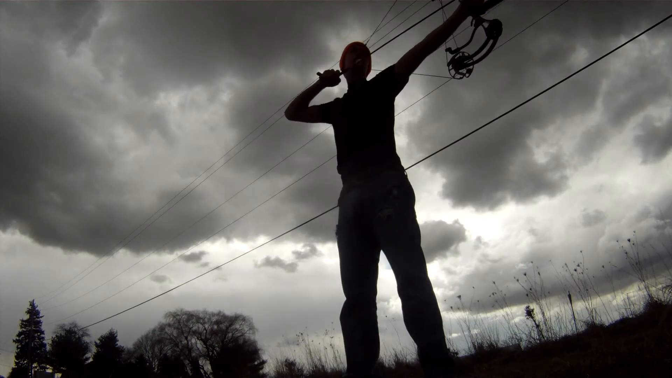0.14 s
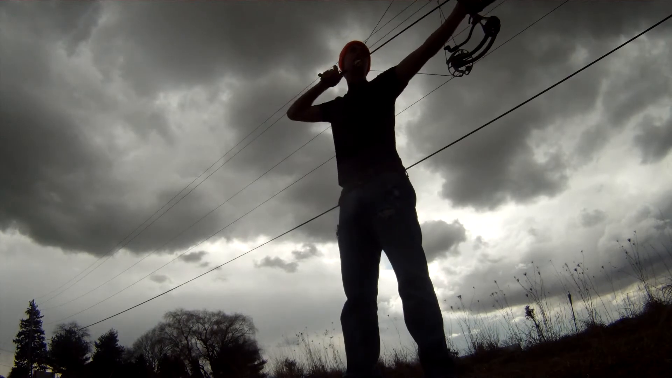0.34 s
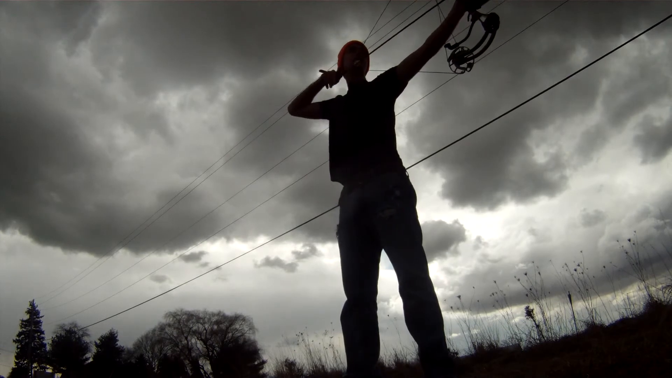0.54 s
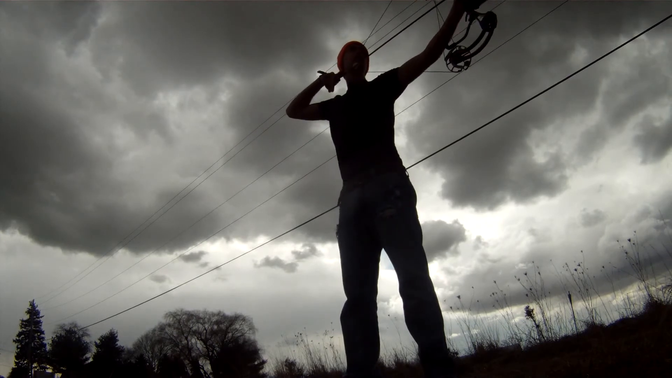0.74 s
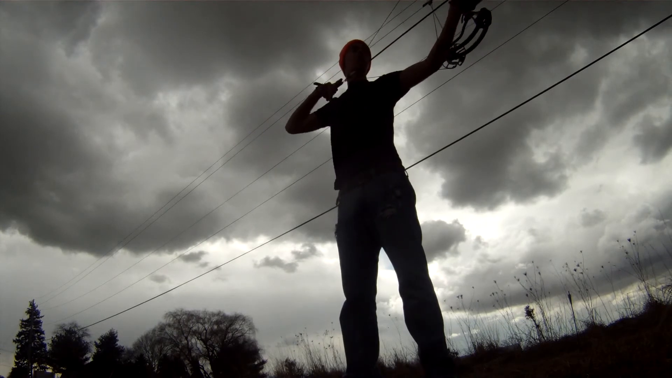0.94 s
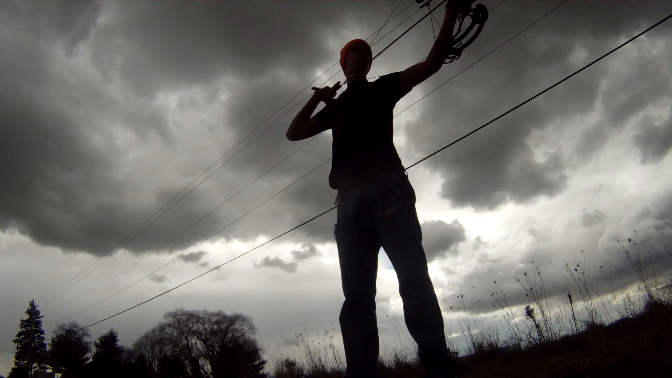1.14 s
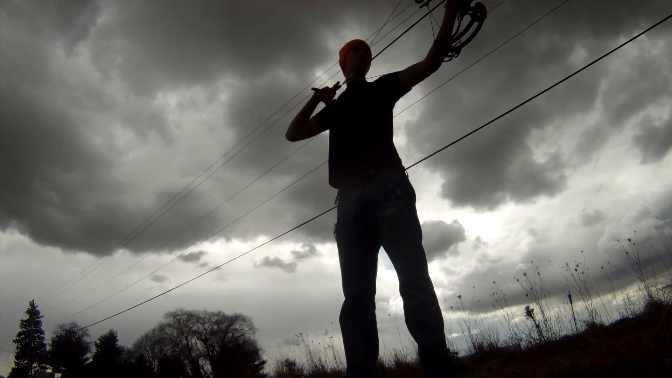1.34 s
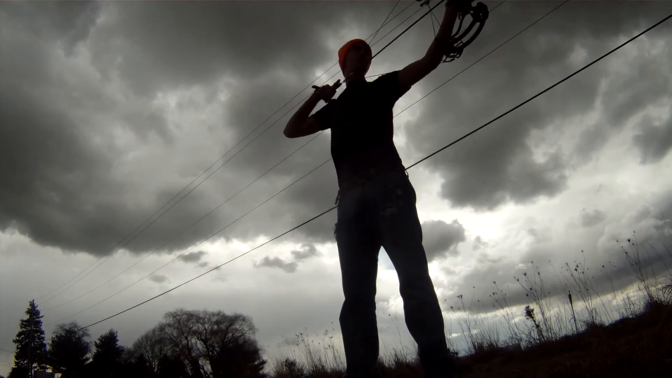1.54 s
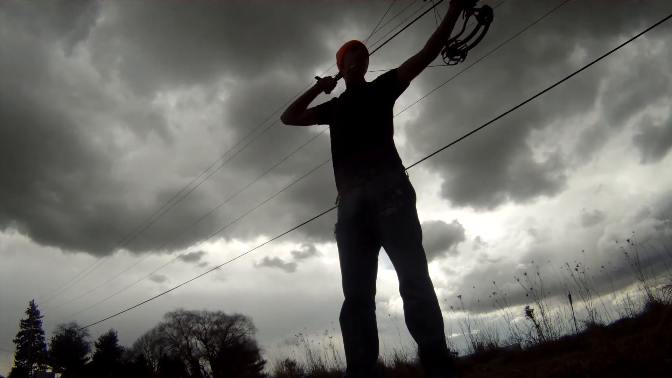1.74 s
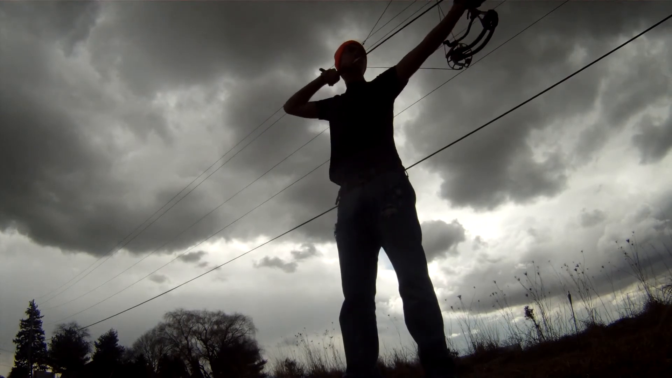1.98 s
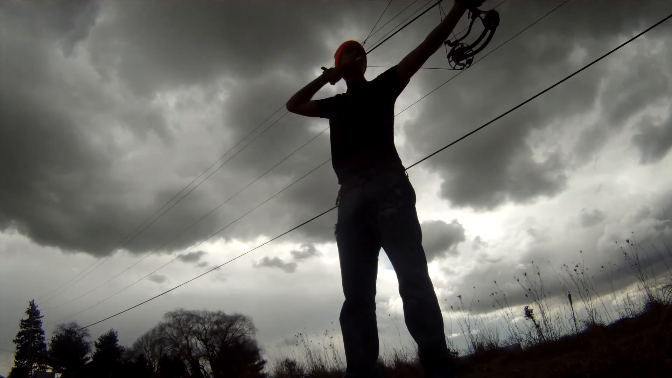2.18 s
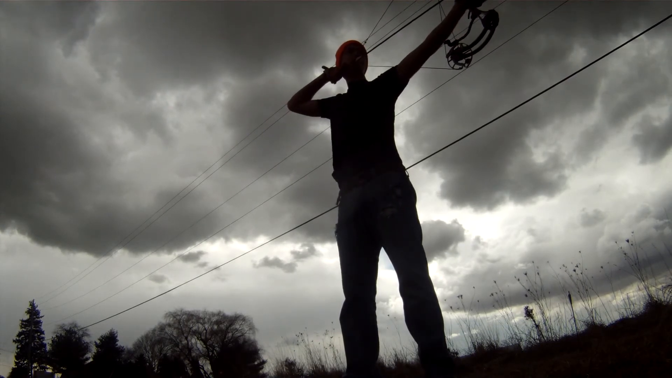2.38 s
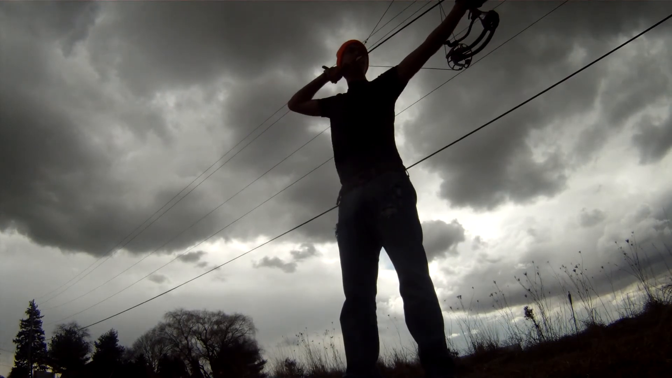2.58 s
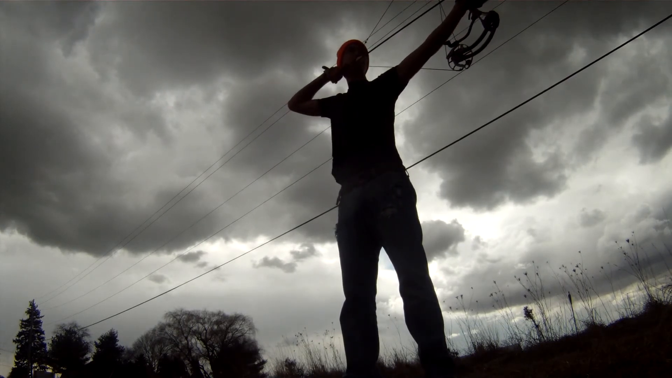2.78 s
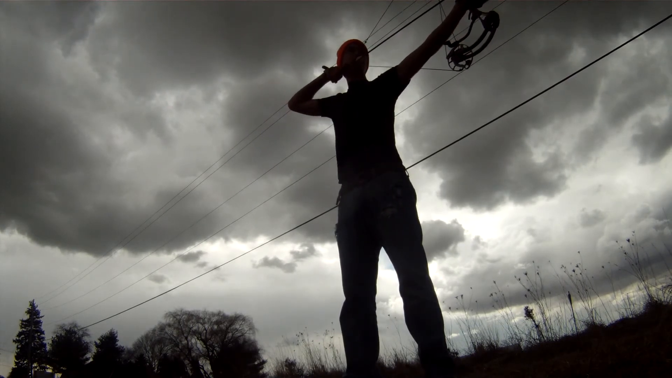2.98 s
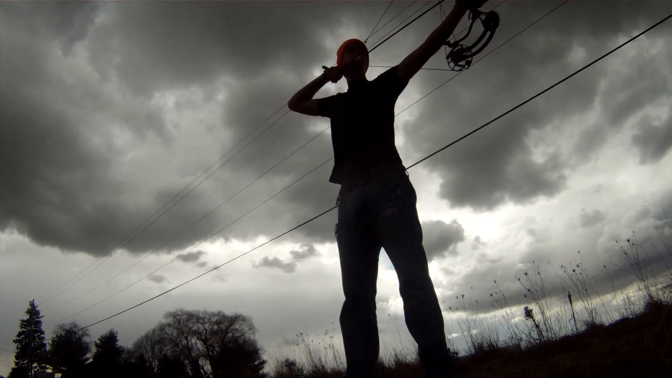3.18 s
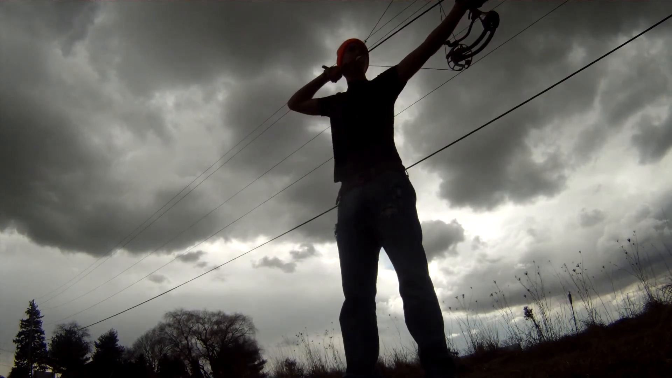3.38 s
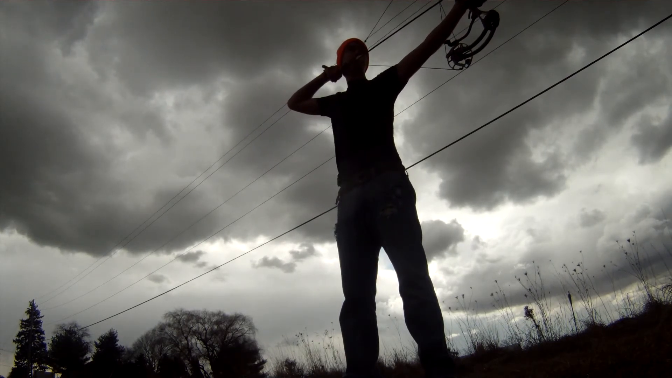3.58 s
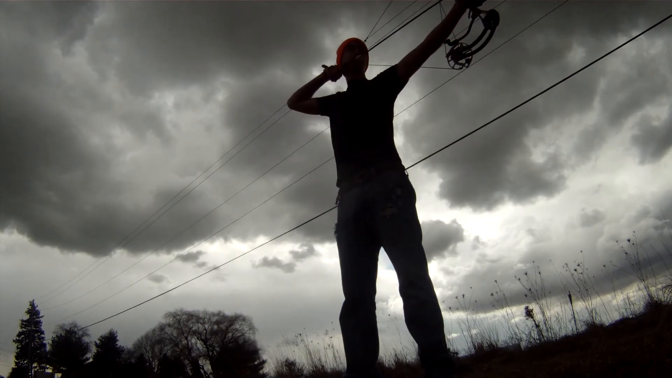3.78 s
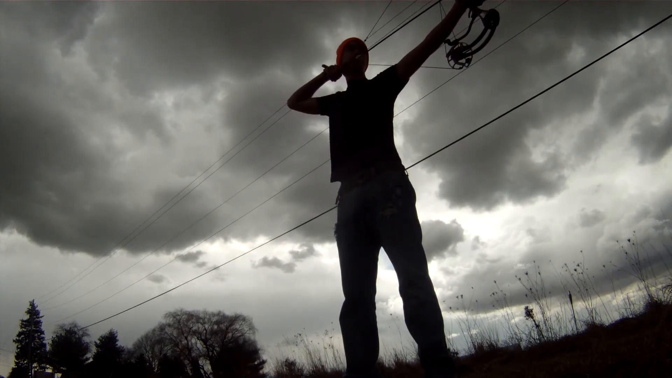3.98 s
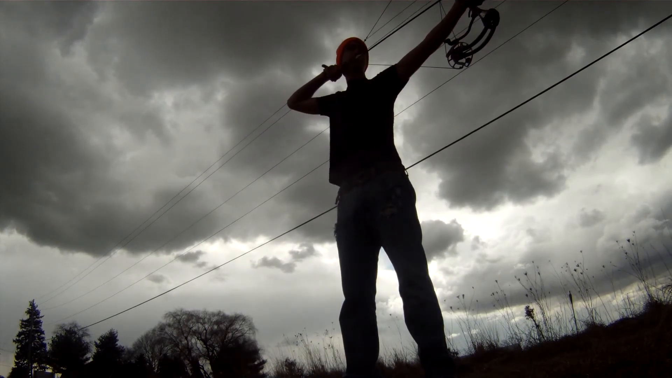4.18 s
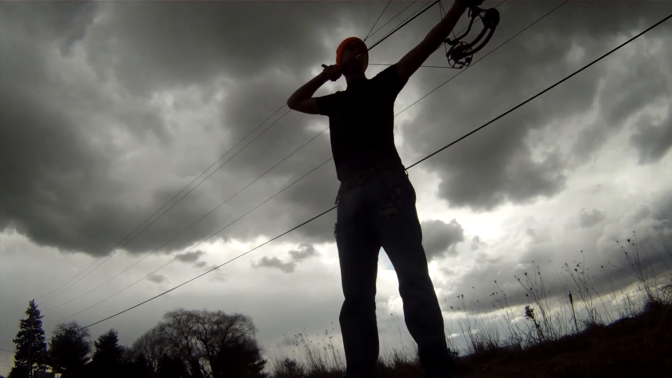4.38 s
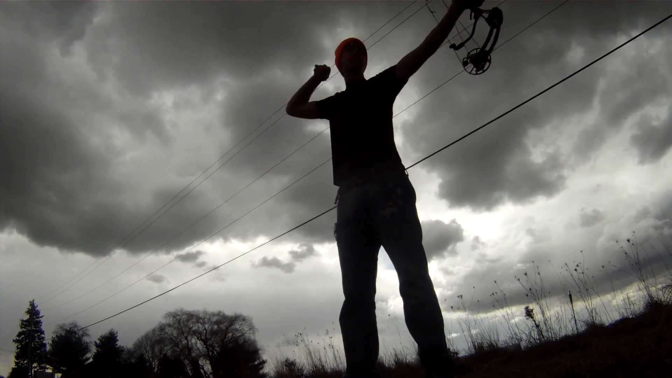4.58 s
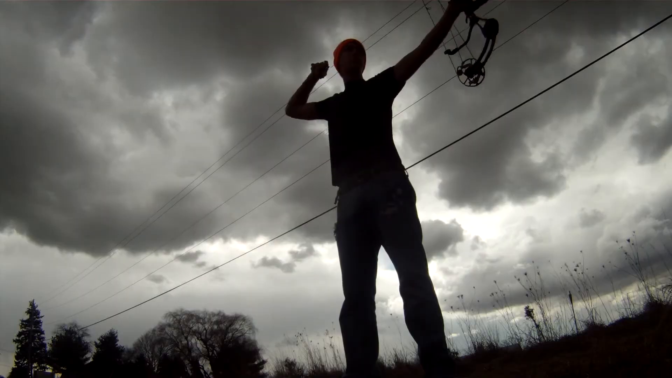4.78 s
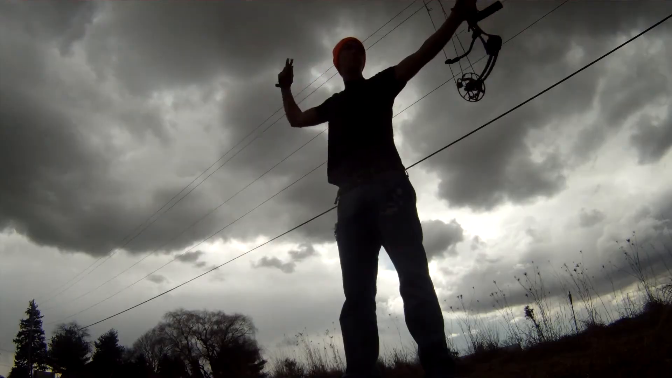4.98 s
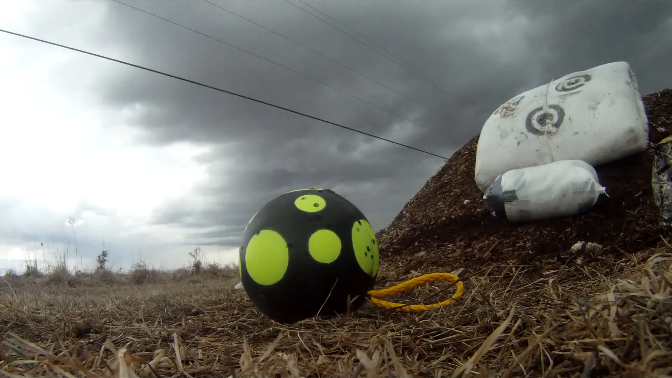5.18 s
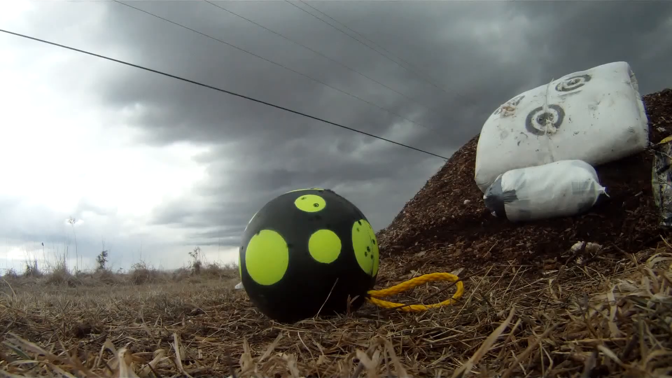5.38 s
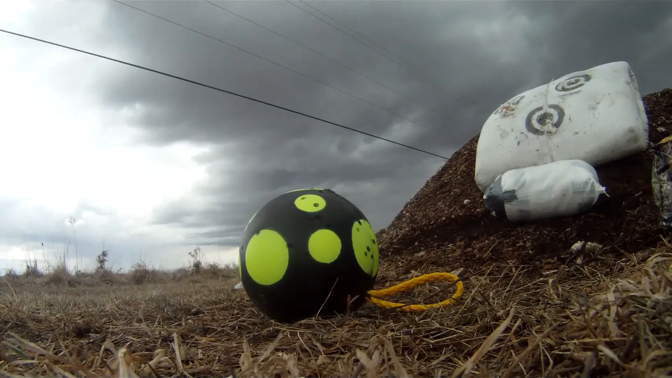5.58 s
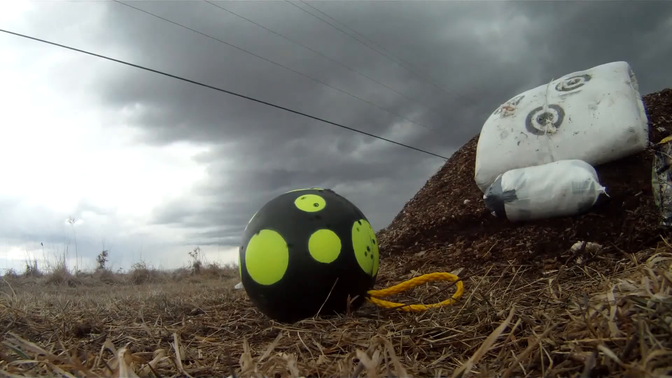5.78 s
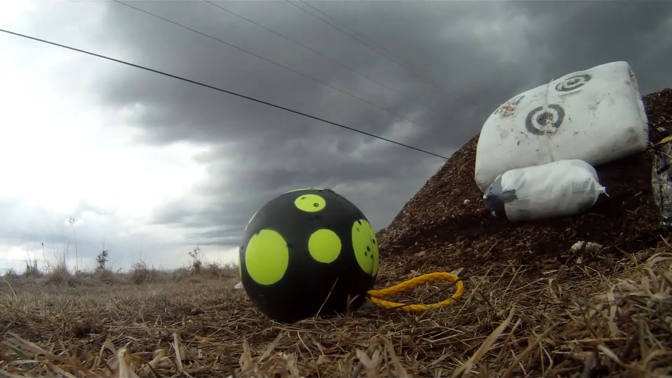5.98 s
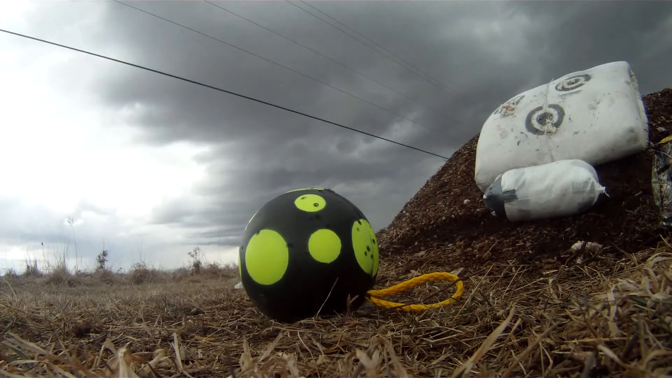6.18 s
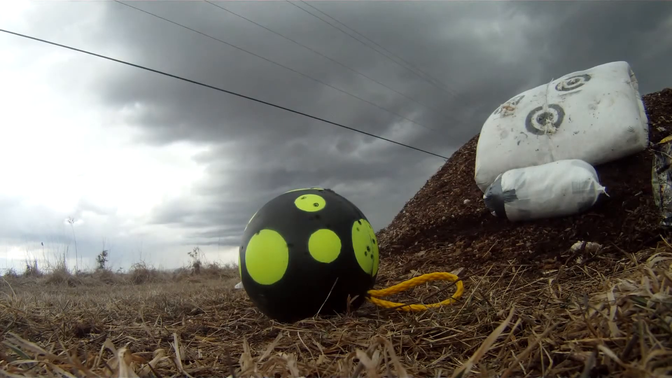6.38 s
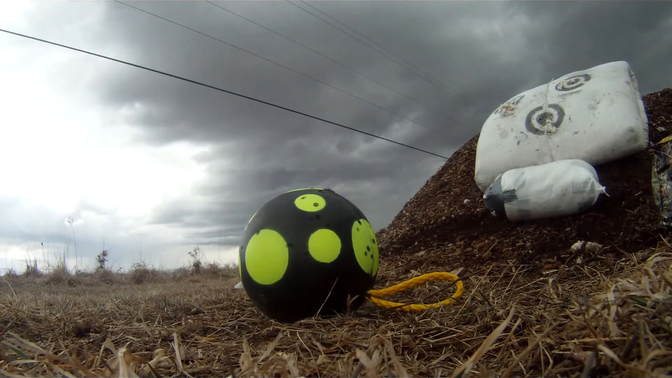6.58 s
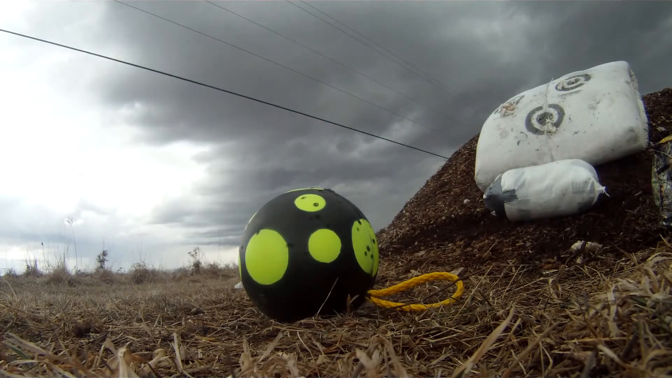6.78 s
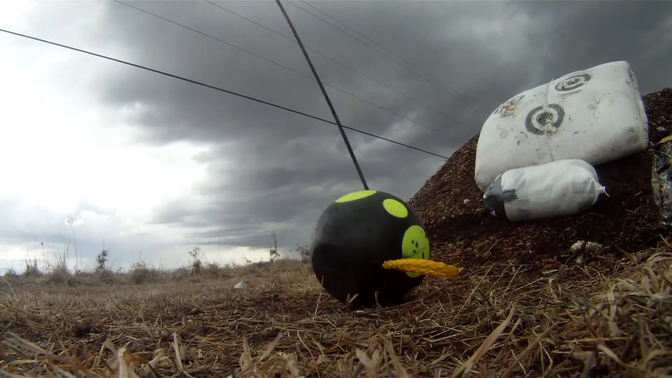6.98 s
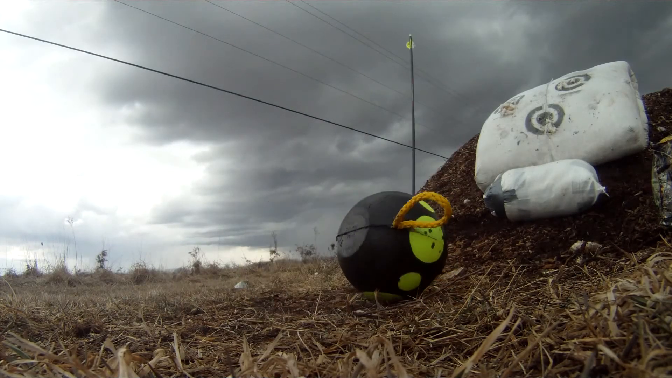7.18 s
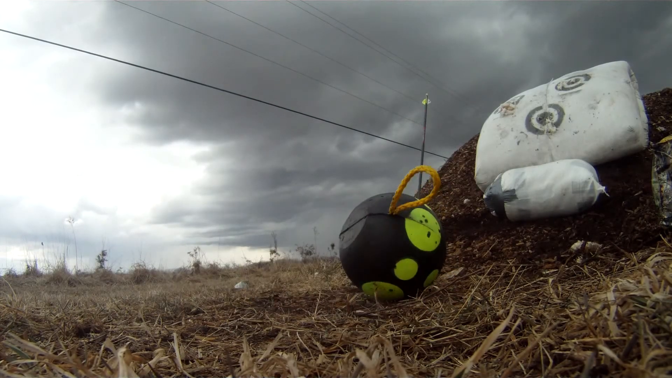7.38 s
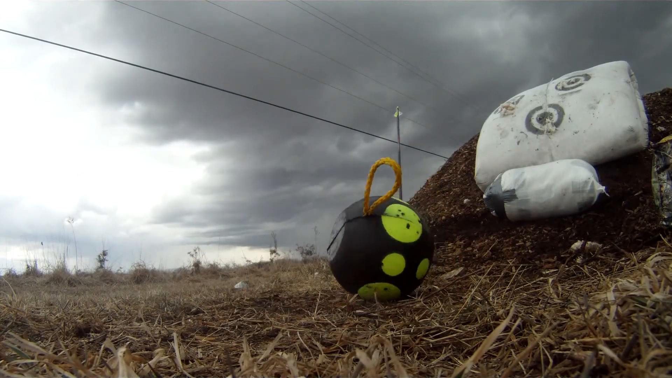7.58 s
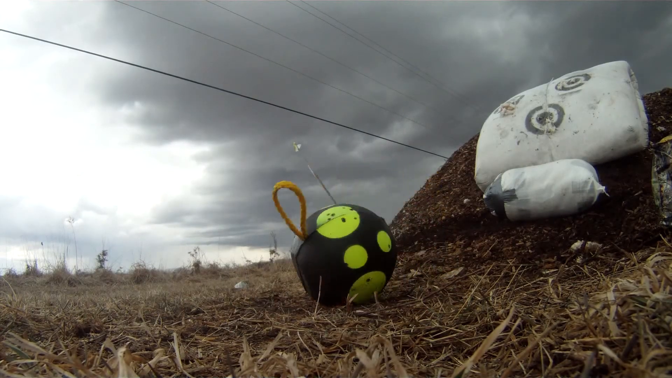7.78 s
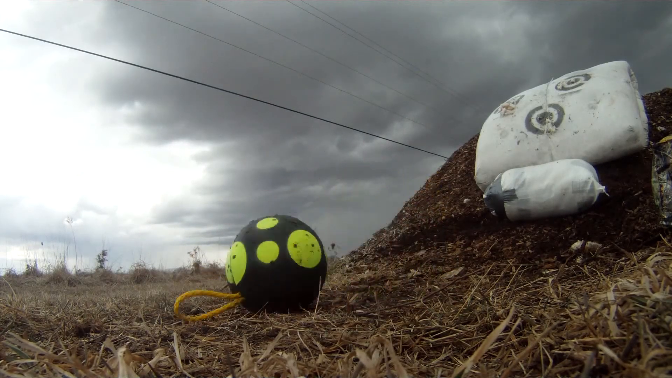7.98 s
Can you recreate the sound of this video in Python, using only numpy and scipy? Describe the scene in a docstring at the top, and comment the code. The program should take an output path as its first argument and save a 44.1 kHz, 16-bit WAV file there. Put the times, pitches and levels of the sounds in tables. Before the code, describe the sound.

Two bow shots in a breezy field: one close string snap and thud, then a distant snap and a loud, close arrow impact.

```python
"""Two compound-bow shots in a windy field, one heard beside the archer and one beside the foam target.
The string whips forward, the bow rattles and the arrow thuds in. After a brief, almost silent break
a far bow snaps and a second arrow hisses in, knocking the target through dry grass.
Birds whistle, wind rumbles on the microphone and, at the target, overhead wires hum.
A small camera picks it all up: it overloads, and holding its samples at 12 kHz adds a gritty edge."""
import sys
import numpy as np
from scipy import signal
from scipy.fft import rfft, irfft
from scipy.io import wavfile

SR = 44100
rng = np.random.default_rng(int(sys.argv[2]) if len(sys.argv) > 2 else 0)


def persist_wave(psi):
    """Save psi, clipped to +-1, as 16-bit WAV."""
    counts = np.round(np.clip(psi, -1, 1) * 32767).astype(np.int16)
    wavfile.write(sys.argv[1], SR, np.atleast_2d(counts).T)


N = 354740
T = np.arange(N) / SR
FREQS = np.fft.rfftfreq(N, 1 / SR)
HOLD_HZ = 12000  # the camera's sampling rate

# A "t60" is the time in seconds that a sound takes to fade by 60 dB.
# The ringing tones of a bow's limbs, handle and cables. Each row: pitch in Hz, level in dB, t60.
BOW_MODES = [(221, -6, 0.098), (355, -2, 0.15), (425, -29, 0.078), (424, -10, .18), (521, -29.5, 0.12),
             (595, -34.5, 0.12), (585, -9, 0.088), (650, -14.5, 0.1), (716, -8.5, .13), (786, -14, 0.17),
             (827, -21, .1), (1260, -13, 0.041), (1303, -31.5, 0.6)]
# The bright ring of an arrow shaft or dry stalk. Each row: pitch in Hz, level in dB, t60.
ROD_MODES = [(3280, -7, 0.015), (4430, -14, 0.0037), (4736, -7.5, 0.0081), (5100, 2, 0.0056)]
# Arrows striking the target. Each row: start in seconds, strength in dB, contact time and
# stopping time in seconds, then the levels of crunch, shaft click and first bounce in dB.
ARROW_HITS = [(4.8123, -8.7, .0014, .001, -47.5, -37, -15.5), (6.8640, 8.2, .00031, .00226, -1, -17, -32)]
# The dull colour of sound scattered by the ground. Each row: frequency in Hz, relative level in dB.
GROUND_COLOUR = [(200, -1.5), (650, 9.5), (1000, -10), (2000, -27.5), (5500, -39)]


def near_bow(fittings_db=-.5):
    """The string whips home; every knock rings the frame and rattles the cams (pulleys) and fittings."""
    # Cams and metal fittings. Each row: pitch in Hz, level in dB, t60.
    fitting_modes = [(2810, -21, 0.21), (3090, -17, 0.11), (3380, -17, 0.15), (3270, -23, 0.15),
                     (3490, -19, 0.091), (3930, -19, 0.13), (3770, -17.5, 0.073), (3900, -9, 0.014),
                     (4387, -36, 0.098), (4880, -7, 0.016)]
    # The rattle's colour. Each row: frequency in Hz, relative level in dB.
    rattle_colour = [(150, 0), (700, 15), (1050, -8), (2000, -7), (2600, 3.5), (3200, 14), (3900, -2),
                     (4700, -1), (5500, -7.5)]
    starts, frame_db, rattle_db, t60 = np.transpose(bow_knocks())
    frame = struck(starts, frame_db, BOW_MODES)
    fittings = struck(starts, rattle_db + fittings_db, fitting_modes)
    rattle = bursts(zip(starts, rattle_db, t60)) * noise(rattle_colour) * from_db(2 * drift(900))
    field_echo = bursts([(4.457, -56, 1.0)]) * noise(GROUND_COLOUR)
    return string_whip() + frame + fittings + rattle + field_echo


def string_whip(start=4.4355, level_db=-11, whip_hz=470, rest_hz=352, settle_s=.009):
    """The string gives a short tone whose pitch falls as it comes to rest."""
    hz = rest_hz + (whip_hz - rest_hz) * np.exp(-((T - start) / settle_s) ** 2)
    level = from_db(level_db) * swell(start, attack_s=.005, hold_s=.008, release_s=.004)
    return -level * np.sin(phase_of(hz * (T > start)))


def bow_knocks(knock_t60=.045, swing_s=.0265, loss_db=5):
    """The trigger clicks, parts hit their stops, then the bow shudders more weakly on each swing."""
    # String, cams and limbs stopping. Each row: start in seconds, frame ring in dB, rattle in dB.
    hard_knocks = [(4.436, -47, -21.5), (4.439, -19.5, -19.5), (4.448, -21, -22.5), (4.4615, -35, -26),
                   (4.4675, -31.5, -26.5), (4.483, -29, -29)]
    # The rows below add the rattle's t60 as a fourth column.
    trigger = [(4.414, -70, -48.5, .2)]
    knocks = [(*knock, knock_t60) for knock in hard_knocks]
    shudder = [(4.5 + k * swing_s, -46.5 - k * loss_db, -40 - k * loss_db, .085) for k in range(4)]
    return trigger + knocks + shudder


def arrow_leaving():
    """The shaft scrapes over its rest in a bright zip, loudest as its tail leaves the string."""
    # The zip's colour. Each row: frequency in Hz, relative level in dB.
    zip_colour = [(2500, -11), (3300, -10), (3800, 6.5), (4400, -7.5), (5000, -1.5), (5800, -15.5)]
    slide = from_db(-32) * swell(4.4262, attack_s=.0016, hold_s=.037, release_s=.027)
    leaving_string = bursts([(4.435, -25, .025)])
    return (slide + leaving_string) * noise(zip_colour)


def arrow_hits(crunch_t60=.012, echo_db=-41, echo_t60=.079):
    """Soft pushes make the foam thud while the point crunches through it and the shaft clicks."""
    # The foam's quickly fading tones. Each row: pitch in Hz, level in dB, t60.
    foam_modes = [(130, -25.5, 0.021), (260, -16, 0.013), (324, -16.5, 0.03), (523, 2, 0.011),
                  (1400, -24.5, 0.01), (1926, -13, 0.0036), (3120, -4, 0.0037)]
    # The crunch's colour. Each row: frequency in Hz, relative level in dB.
    crunch_colour = [(300, 13), (700, 7), (1050, -20.5), (1500, 10), (3000, 9), (4200, -19), (5500, -10)]
    starts, db, direction, contact_s, crunch_db, click_db = np.transpose(arrow_blows())
    force = np.zeros(N)
    for start, strength, length in zip(starts, direction * from_db(db), contact_s):
        pulse = np.hanning(max(int(length * SR), 3))
        force[int(start * SR):][:len(pulse)] += strength * pulse / pulse.sum()
    thud = sum(from_db(mode_db) * ring(force, hz, t60) for hz, mode_db, t60 in foam_modes)
    # A small body gives off little deep bass.
    thud = signal.sosfilt(signal.butter(1, 200, "high", fs=SR, output="sos"), thud)
    crunch = bursts(zip(starts, crunch_db, np.full(len(starts), crunch_t60))) * noise(crunch_colour)
    echo = bursts(zip(starts, db + echo_db, np.full(len(starts), echo_t60))) * noise(GROUND_COLOUR)
    return thud + crunch + echo + struck(starts, click_db, ROD_MODES)


def arrow_blows(recoil_s=.0014, bounce_gap_s=.0082, bounce_contact_s=.0016, return_s=.0023):
    """Each arrow pushes the foam, the foam springs back, and the target bounces twice on its support."""
    # Each row: start in seconds, strength in dB, direction, contact in seconds, crunch and click in dB.
    blows = []
    for start, db, contact_s, stop_s, crunch_db, click_db, bounce_db in ARROW_HITS:
        blows.append((start, db, 1, contact_s, crunch_db, click_db))
        blows.append((start + stop_s, db - 1.1, -1, recoil_s, crunch_db - 9, click_db - 9))
        for k in range(2):
            bounce_at = start + (k + 1) * bounce_gap_s
            softness = 1.5 ** k  # a longer contact sounds softer
            touch = (bounce_contact_s * softness, bounce_db - 42, bounce_db - 26 - 15 * k)
            blows.append((bounce_at, bounce_db, -1, *touch))
            blows.append((bounce_at + return_s * softness, bounce_db, 1, *touch))
    return blows


def far_bow():
    """A distant bow gives a dull snap, and its frame rings with it."""
    # The crack and its rattling tail. Each row: start in seconds, level in dB, t60.
    snaps = [(6.6510, -31.5, 0.024), (6.654, -38, .15)]
    # The snap's colour. Each row: frequency in Hz, relative level in dB.
    snap_colour = [(100, -4), (220, -7), (310, 8.5), (420, 6), (750, -17), (1400, -6.5), (2200, -18),
                   (3500, -20), (5500, -28)]
    # The knock on the frame. Its row: start in seconds, level in dB.
    frame_knock = [(6.6536, -40)]
    return bursts(snaps) * noise(snap_colour) + struck(*np.transpose(frame_knock), BOW_MODES)


def arrow_and_grass_swish(rise_db_per_s=640, attack_s=.01, grain_db=4):
    """The second arrow hisses louder as it closes in, then the target scuffs the dry grass."""
    # The scuffs. Each row: start in seconds, level in dB, length in seconds.
    scuffs = [(6.865, -42.5, 0.022), (6.936, -55.5, .038), (6.991, -61, .046)]
    # The swish's colour. Each row: frequency in Hz, relative level in dB.
    swish_colour = [(200, 4), (500, 8.5), (1000, -13.5), (2400, 2), (4000, -11), (5500, -11)]
    to_impact = ARROW_HITS[-1][0] - T
    approach = from_db(-42 - rise_db_per_s * abs(to_impact)) * (to_impact > 0)
    scuffing = sum(from_db(db) * swell(start, attack_s, 0, length - attack_s)
                   for start, db, length in scuffs)
    return (approach + scuffing) * from_db(-grain_db * drift(440)) * noise(swish_colour)


def dry_ticks():
    """Thin stiff shafts or stalks ring briefly with small ticks."""
    # Each row: start in seconds, level in dB.
    ticks = [(4.8003, -60), (5.6494, -43.5), (5.6535, -56), (5.8037, -52), (7.4223, -59), (7.5767, -54)]
    return struck(*np.transpose(ticks), ROD_MODES)


def bird_whistles(waver=.0039, flutter_db=1.3, attack_s=.035, release_s=.022):
    """Nearly pure whistles scoop up to their pitch, hold it, sag and drop at the end."""
    # Each row: start and length in seconds, top pitch in Hz, level in dB, side tones in relative dB.
    calls = [(1.532, .305, 3520, -57, -19.5), (2.232, .298, 3515, -59.5, -27),
             (4.918, .19, 3580, -59.5, -22), (5.99, .3, 3040, -74, -30), (7.945, .07, 3440, -73, -30)]
    # Faint reedy side tones. Each row: multiple of the pitch, level in dB, growth in dB per second.
    side_tones = [(.75, -1, -12), (1.25, -7, -5), (1.499, -2, 42)]
    out = np.zeros(N)
    unsteady = 1 + waver * drift(150)
    flutter = flutter_db * drift(55)
    catch_db = 14 * np.exp(-((T - 2.353) / .009) ** 2)  # one whistle catches for an instant
    for start, length, top_hz, db, reedy_db in calls:
        on = (T >= start) & (T < start + length)
        age = T[on] - start
        scoop_hz = 600 * np.exp(-age / .00803)
        sag_hz = 1250 * np.maximum(age - .1, 0)
        drop_hz = 476 * np.exp((age - length) / .02)
        phase = phase_of((top_hz - scoop_hz - sag_hz - drop_hz) * unsteady[on])
        weakening_db = 7 * np.exp(-((age - .22) / .06) ** 2)  # the level dips during the sag
        level = from_db(db + flutter[on] - catch_db[on] - weakening_db)
        shape = swell(start, attack_s, length - attack_s - release_s, release_s)[on]
        reed = sum(from_db(reedy_db + tone_db + growth * age) * np.sin(multiple * phase)
                   for multiple, tone_db, growth in side_tones)
        out[on] += level * shape * (np.sin(phase) + reed)
    return np.sqrt(2) * out


def bird_chips(width_s=.0095, rasp=.125):
    """Very short bird calls, made raspy by a fast jitter in pitch."""
    # Each row: middle of the call in seconds, level in dB, pitch in Hz.
    calls = [(2.13, -67, 3000), (2.704, -66, 3100), (3.52, -70, 2980), (3.705, -63.5, 3490),
             (4.075, -68.5, 3150), (5.193, -67, 3110), (6.388, -69.5, 3040), (7.586, -63, 2950)]
    out = np.zeros(N)
    jitter = 1 + rasp * drift(1200)
    for middle, db, hz in calls:
        on = abs(T - middle) < 4 * width_s
        shape = np.exp(-.5 * ((T[on] - middle) / width_s) ** 2)
        out[on] += from_db(db) * shape * np.sin(phase_of(hz * jitter[on]))
    return np.sqrt(2) * out


def wind(lumps_db=1.86):
    """Wind rumbles unevenly on the microphone's opening; single gusts push and pull it once."""
    # The wind's strength. Each row: time in seconds, level in dB.
    strength = [(0, -52), (1.2, -52.5), (2.3, -56), (3.3, -54.5), (3.95, -52.5), (4.7, -51.5), (5.6, -52.5),
                (6.2, -48), (6.75, -51), (7.15, -47), (7.6, -52.5), (8.04, -54.5)]
    # The rumble's colour. Each row: frequency in Hz, relative level in dB.
    rumble_colour = [(15, -7), (35, 2.5), (70, 2.5), (120, 1), (200, -6), (400, -41)]
    # Thumping gusts. Each row: start in seconds, level in dB, frequency in Hz.
    gusts = [(1.716, -41, 35), (3.513, -38, 33.4), (3.851, -31, 49.7), (3.913, -34, 39.6),
             (4.026, -37, 55.5), (6.692, -36, 45), (7.02, -37, 40), (7.11, -36.5, 32), (7.191, -35, 38)]
    out = from_db(curve(strength) + lumps_db * drift(18)) * noise(rumble_colour)
    for start, db, hz in gusts:
        cycles = np.maximum(T - start, 0) * hz
        fade = np.exp(-np.minimum(cycles, 10) ** 2)
        out += from_db(db) * np.sin(2 * np.pi * cycles) * fade
    return out


def wire_hum(calm_hz=88.03, waver=.013, flutter_db=3):
    """Swirls of air peel off overhead wires and hum; faster wind raises pitch and level together."""
    # The first wire's pitch. Each row: time in seconds, pitch in Hz.
    pitch_path = [(5.1, 88), (5.55, 88), (6.0, 90.96), (6.27, 93), (6.8, 89.64), (7.17, 91.4), (7.7, 88.45),
                  (8.04, 87.9)]
    # Its tones. Each row: multiple of the pitch, level in dB when calm, dB gained per Hz of pitch rise.
    partials = [(1, -58, 0.9), (2, -59.5, 2.0)]
    pitch = curve(pitch_path)
    first_wire = [(multiple * pitch, db + slope * (pitch - calm_hz)) for multiple, db, slope in partials]
    second_wire = [(100, -58)]  # stays near 100 Hz and -58 dB
    out = np.zeros(N)
    for hz, db in first_wire + second_wire:
        level = from_db(db + flutter_db * drift(18))
        out += level * np.sin(phase_of(hz * (1 + waver * drift(35))))
    return np.sqrt(2) * out


def open_air(at_archer, at_target):
    """A soft, steady rush of outdoor air, with its own colour at each place."""
    # Each row of both tables: frequency in Hz, relative level in dB.
    archer_colour = [(59, -37), (100, -6), (290, -7.5), (325, -9.5), (518, -8.5), (734, -14), (974, -20.5),
                     (2090, -25.5), (2390, -28.5), (2910, -28), (5300, -31.5), (6890, -45), (11700, -120)]
    target_colour = [(130, -47.5), (220, 2), (324, -3.5), (446, -4), (597, -5.5), (638, -10), (1580, -18.5),
                     (1830, -21.5), (2090, -21), (5300, -27.5), (6890, -64), (11700, -120)]
    archer_air = from_db(-56.5) * noise(archer_colour)
    target_air = from_db(-57) * noise(target_colour)
    return at_archer * archer_air + at_target * target_air


def from_db(db):
    """Turn decibels into a gain."""
    return 10 ** (np.asarray(db) / 20)


def curve(points):
    """Join (seconds, value) points with straight lines."""
    return np.interp(T, *np.transpose(points))


def phase_of(hz):
    """The running phase of a moving pitch."""
    return 2 * np.pi * np.cumsum(hz) / SR


def noise(colour):
    """Noise of average power 1, shaped by (Hz, dB) points and kept below half the camera's rate."""
    hz, db = np.transpose(colour)
    freqs = np.maximum(FREQS, 1)
    gain = from_db(np.interp(np.log(freqs), np.log(hz), db))
    edges = np.minimum(freqs / hz[0], 1) ** 2 * (freqs < HOLD_HZ / 2)
    shaped = irfft(rfft(rng.standard_normal(N)) * gain * edges, N)
    return shaped / shaped.std()


def drift(rate):
    """A random wander of size about 1 that turns `rate` times a second."""
    return np.interp(T * rate, np.arange(N // 10), rng.standard_normal(N // 10))


def ring(force, hz, t60):
    """One mode, or natural tone, of an object: each push starts a fading sine wave."""
    decay, step = from_db(-60 / (t60 * SR)), 2 * np.pi * hz / SR
    return signal.lfilter([0, np.sin(step)], [1, -2 * decay * np.cos(step), decay ** 2], force + 1e-18)


def struck(times, levels_db, modes, spread_db=2.5):
    """Each touch rings all of an object's tones, each with a slightly random strength."""
    out = np.zeros(N)
    for hz, mode_db, t60 in modes:
        clicks = np.zeros(N)
        chance_db = spread_db * rng.standard_normal(len(times))
        clicks[(times * SR).astype(int)] = from_db(levels_db + mode_db + chance_db)
        out += ring(clicks, hz, t60)
    return out


def bursts(rows):
    """The loudness shape of sudden, fading bursts. Each row: start in seconds, level in dB, t60."""
    power = np.zeros(N)
    for start, db, t60 in rows:
        first = int(start * SR)
        age = T[:min(SR // 2, N - first)]
        power[first:first + len(age)] += from_db(db - 60 * age / t60) ** 2
    return np.sqrt(power)


def swell(start, attack_s, hold_s, release_s):
    """A loudness shape that rises smoothly to 1, holds and falls."""
    rise = np.clip((T - start) / attack_s, 0, 1)
    fall = np.clip((start + attack_s + hold_s + release_s - T) / release_s, 0, 1)
    return np.sin(np.pi / 2 * rise * fall) ** 2


def scene(break_start_s=5.055, break_end_s=5.104, break_db=-37):
    """First beside the archer, then beside the target, with an almost silent break between."""
    at_archer, at_target = T < break_start_s, T > break_end_s
    background = open_air(at_archer, at_target) + at_target * wire_hum()
    shots = near_bow() + arrow_leaving() + arrow_hits() + far_bow() + arrow_and_grass_swish()
    field = shots + dry_ticks() + bird_whistles() + bird_chips() + wind() + background
    return (field * np.where(at_archer | at_target, 1, from_db(break_db)))[None]


def record(dry, band_edge_hz=5550, full_scale=.93, cutoff_hz=15250):
    """The camera cuts the treble and overloads; holding each sample mirrors the sound around 12 kHz."""
    narrow = signal.sosfilt(signal.butter(10, band_edge_hz, fs=SR, output="sos"), dry)
    clipped = narrow / (1 + (narrow / full_scale) ** 8) ** (1 / 8)
    mirrored = clipped * (1 + 2 * np.cos(2 * np.pi * HOLD_HZ * T))
    held = irfft(rfft(mirrored) * np.sinc(FREQS / HOLD_HZ), N)
    return signal.sosfilt(signal.ellip(10, .2, 80, cutoff_hz, fs=SR, output="sos"), held)


dry = scene()
out = record(dry)
persist_wave(out)
```